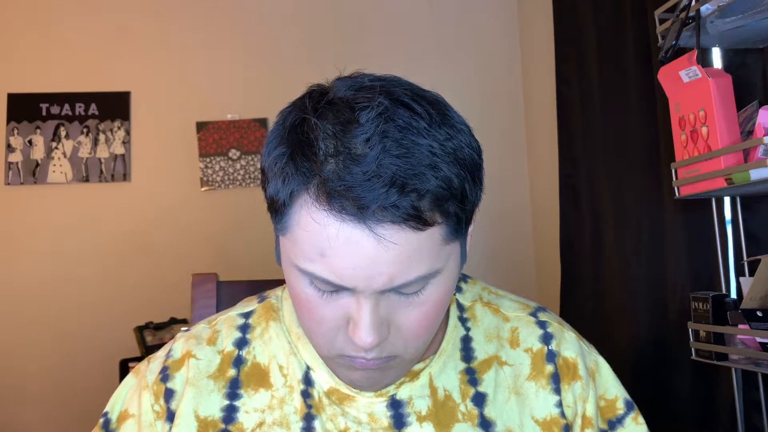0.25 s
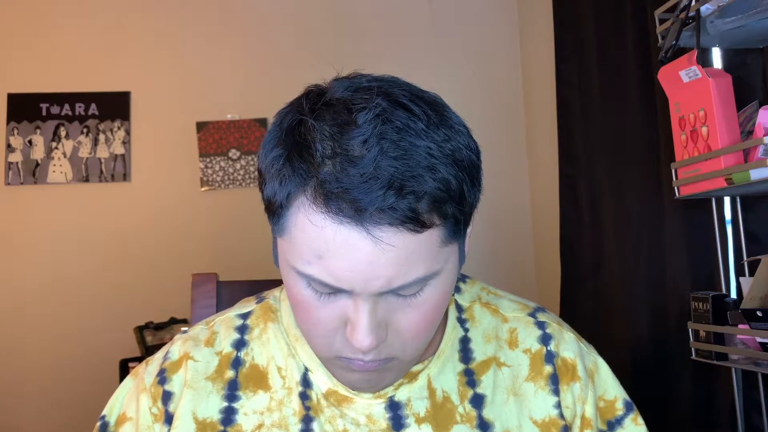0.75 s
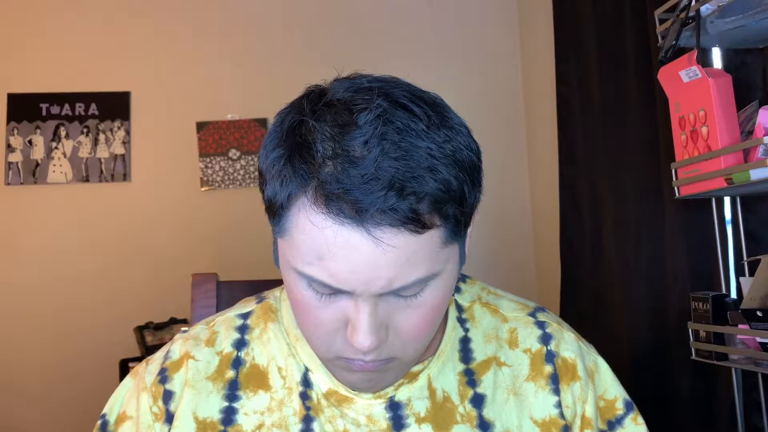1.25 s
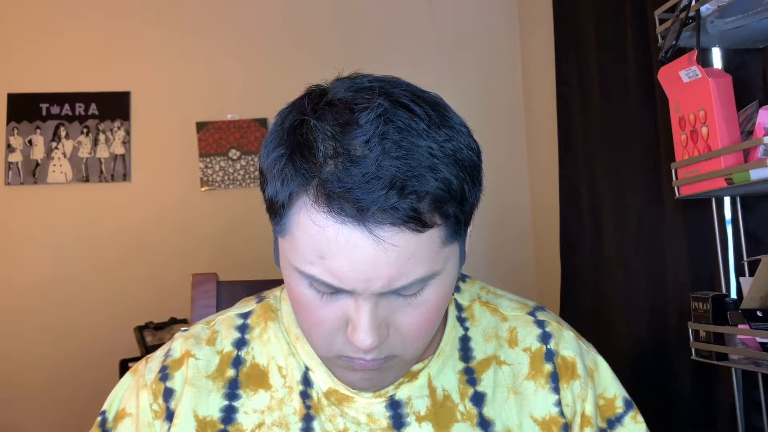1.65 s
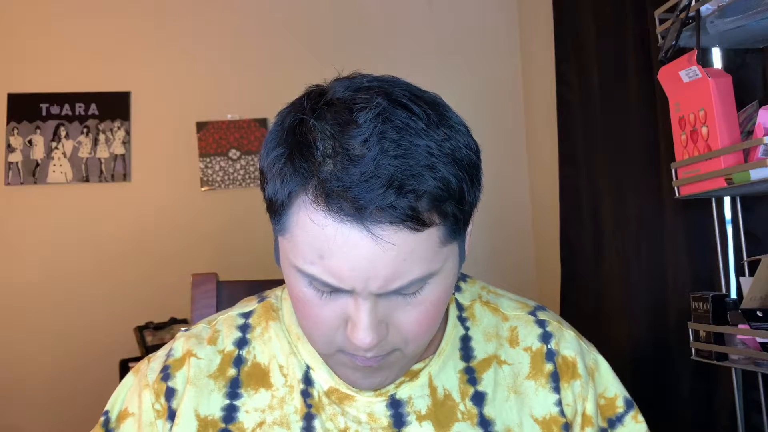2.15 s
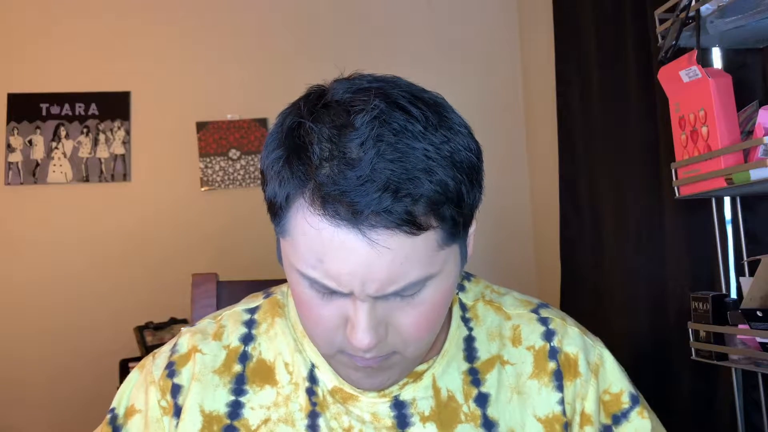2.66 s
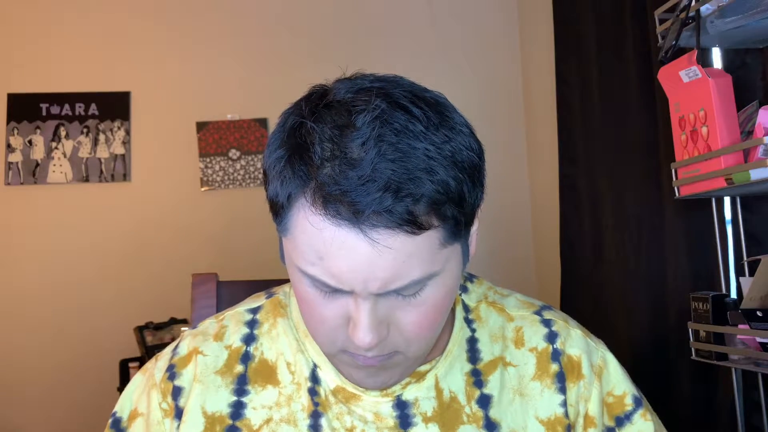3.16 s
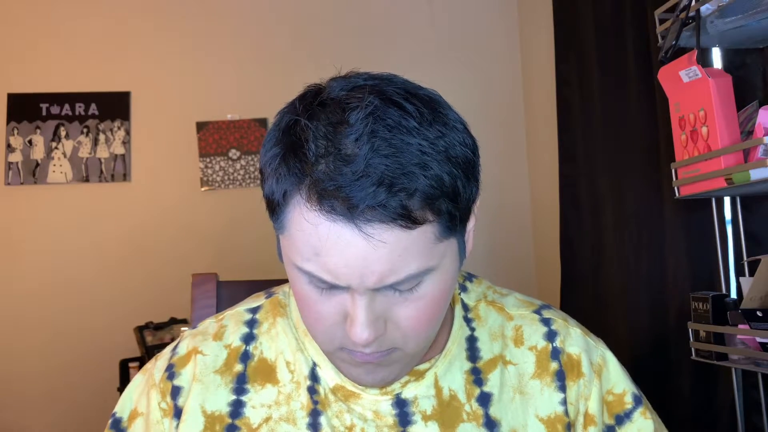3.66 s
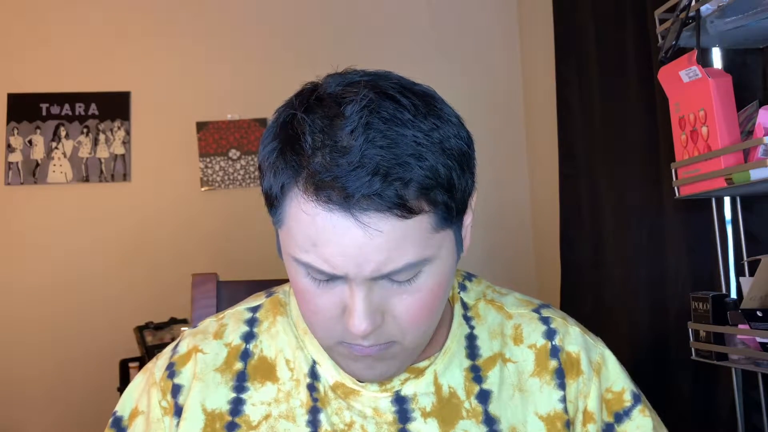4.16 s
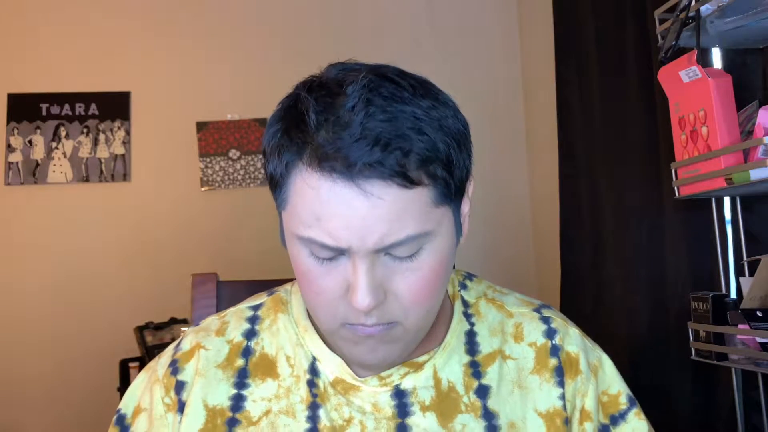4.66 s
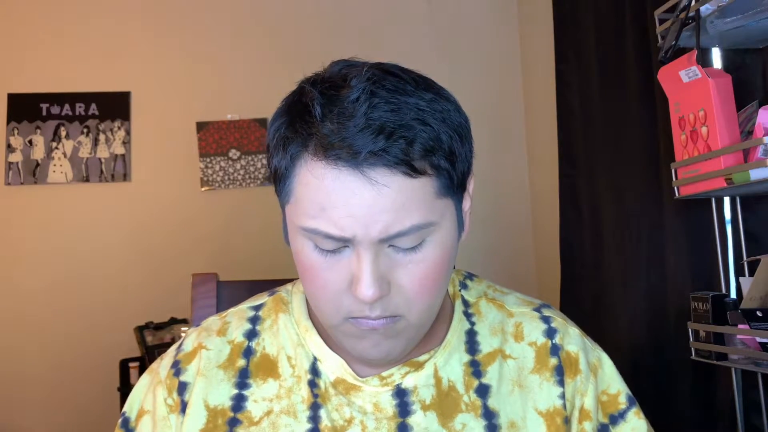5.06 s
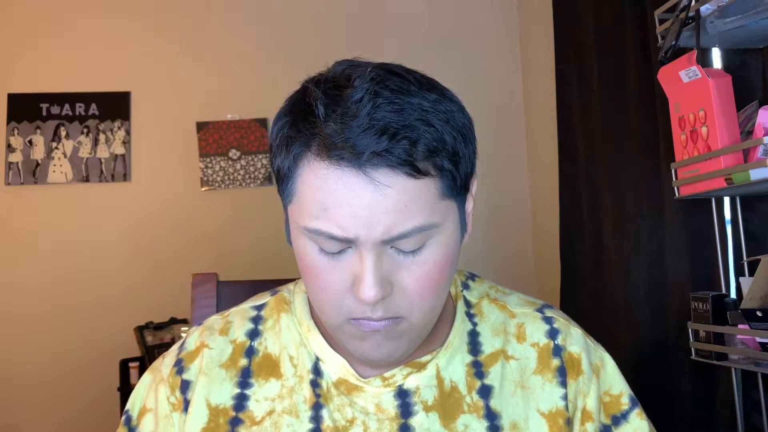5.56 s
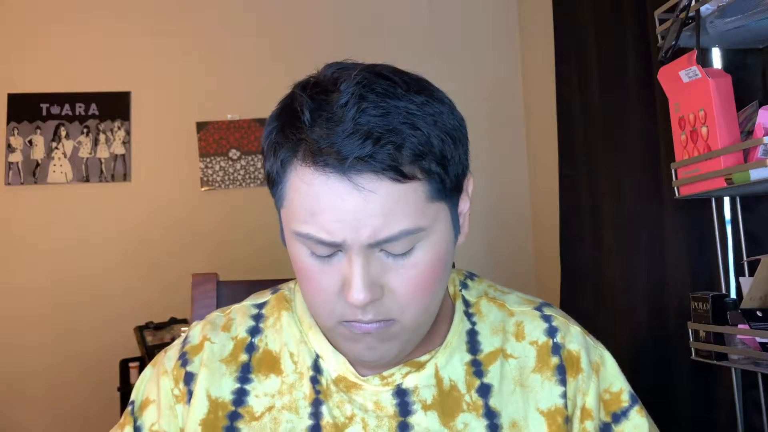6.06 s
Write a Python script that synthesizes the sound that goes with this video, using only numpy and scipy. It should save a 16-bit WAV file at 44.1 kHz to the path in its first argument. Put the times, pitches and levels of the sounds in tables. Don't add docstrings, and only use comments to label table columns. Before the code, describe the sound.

A quiet small room with steady low ventilation hum and very faint hiss, heard close to a desk. From 0 to 1.8 s there are only tiny nail ticks and almost inaudible cloth brushes. At about 1.83-2.3 s a thin stick taps a rim in three little clusters, bright and briefly ringing. At 2.54-2.61 s a plastic case gives a rapid dry rattle. Knocks in small groups follow at 2.9, 3.15, 3.3, 3.5 and 3.65 s, woody-hollow to clicky, then a second rattle at 3.85 s. A lull follows, with a grainy finger slip near 4.43 s and a double click at 4.62 s. Rubbing resumes around 4.9-5.5 s; the lid snaps at 5.15 s, then hardest, with crunch and thud, at 5.53-5.6 s. Brighter single snaps at 5.76, 5.96 and 6.06 s rebound quickly and die in a short soft tail.

```python
import sys
import numpy as np
from scipy import signal
from scipy.fft import rfft, irfft, next_fast_len
from scipy.io import wavfile
from scipy.ndimage import uniform_filter1d, map_coordinates

SR = 44100
rng = np.random.default_rng(int(sys.argv[2]) if len(sys.argv) > 2 else 0)


def linear_from_db(decibels):
    return 10 ** (np.asarray(decibels, float) / 20)


def dump(signal):
    limited = np.clip(np.atleast_2d(signal).T, -1, 1)
    pcm = np.round(limited * 32767).astype(np.int16)
    wavfile.write(sys.argv[1], SR, pcm)


N = 277731

# freq_hz, level_db_per_hz
RUMBLE_SPECTRUM = [(15, -65), (25, -34), (43, -14), (59, -4.5), (92, -8.5), (130, 1.5), (230, -10.5),
                   (263, -11.5), (289, -13), (387, -18.5), (419, -31.5), (525, -30.5), (600, -31.5),
                   (780, -64), (1320, -120)]
# freq_hz, level_db_per_hz
HISS_SPECTRUM = [(240, -31.5), (400, -9), (607, -11.5), (777, -14.5), (1030, -12.5), (1560, -16),
                 (1900, -19), (2360, -27.5), (2970, -19.5), (3530, -26), (16000, -33.5)]
# centre_hz, width_hz, lift_db
DUCT_MODES = [(76, 5.8, 11.5), (115.3, 8.7, -3.5), (258.6, 4.4, 9), (990, 55, 1.5), (1390, 20, 1.5),
              (1928, 150, 1), (3050, 88, -7)]
# freq_hz, t60_s
ROOM_T60 = [(300, 0.25), (1000, 0.24), (3000, 0.24), (7000, 0.23), (15000, 0.24)]
# freq_hz, gain_db
WALL_COLOUR = [(300, 15), (1000, 5), (3000, -0.5), (7000, 1), (15000, 2.5)]
# start_s, peak_db, ring_hz
TICKS = [(0.0281, -51, 3520), (.049, -60, 10900), (.1875, -57, 5200), (.3994, -66, 6270),
         (0.938, -63, 6660), (1.700, -58.5, 5700), (1.8803, -59, 5560), (1.9664, -54, 5740),
         (2.0914, -82, 7000), (2.1046, -55, 9300), (2.2044, -53, 9100), (2.2331, -52, 7100),
         (2.870, -79.5, 8440), (2.880, -57, 8050), (3.119, -55, 5430), (3.2933, -49, 8000),
         (3.4389, -53, 5290), (3.5955, -48, 9170), (3.7897, -53.5, 7660), (5.4827, -39, 6860),
         (5.5005, -53, 5980), (5.7322, -54, 4340), (5.746, -50, 5020), (5.833, -59, 6470),
         (5.854, -61, 7100), (5.8606, -59.5, 7280), (5.9363, -49, 7440), (5.944, -44, 5330)]
# centre_s, level_db, centre_hz, length_s
PUFFS = [
    (0.036, -77, 4800, 0.011),
    (.19, -87, 5460, 0.011),
    (.405, -83, 6000, 0.0092),
    (0.409, -82, 2060, 0.016),
    (0.836, -85, 3050, 0.018),
    (0.944, -80, 6760, 0.02),
    (1.157, -81, 6050, 0.022),
    (2.529, -71, 7450, 0.012),
]
# time_s, level_db
RUB_PRESSURE = [
    [(4.2, -89), (4.22, -76), (4.36, -78.5), (4.4, -73), (4.425, -49), (4.46, -69), (4.5, -93),
     (4.53, -58.5), (4.57, -77)],
    [(4.86, -83), (4.885, -69.5), (4.92, -100), (4.96, -74.5), (5.0, -78), (5.02, -62), (5.065, -53),
     (5.09, -64), (5.125, -61)],
    [(5.25, -74), (5.29, -60), (5.33, -60.5), (5.35, -69), (5.37, -56.5), (5.45, -57), (5.52, -73)],
    [(5.65, -66), (5.74, -68), (5.82, -89), (5.86, -72), (5.945, -74)],
]
# hollow_db, fizz_db, fizz_loss_db_per_db
RUB_GRIP = [
    (-6, -12, 0.4),
    (-6, -16, -0.7),
    (10.5, -11.5, 0),
    (5, -6.5, .1),
]
# freq_hz, gain_db
SKIN_COLOUR = [(400, -32.5), (1200, -22.5), (2000, -10.5), (2700, -5), (3600, -4.5), (4500, -17.5),
               (7000, -32.5)]
# start_s, peak_db, pitch_hz
THUDS = [(2.553, -40, 830), (2.578, -44, 495), (3.608, -52.5, 456), (3.641, -42, 720), (3.671, -47, 450),
         (3.87, -40, 745), (3.889, -40, 718), (4.689, -63, 657), (4.74, -52.5, 528), (5.142, -41.5, 494),
         (5.187, -45.5, 500), (5.535, -34.5, 634), (5.606, -43.5, 614), (6.054, -44, 534)]
# freq_hz, gain_db
STICK_COLOUR = [(300, -37.5), (1000, -18), (2000, -13.5), (2500, -5), (3100, -11.5), (4200, -16.5),
                (6600, -4.5), (9400, -10.5), (16000, -12)]
# start_s, peak_db, ring_hz, bright_db, knock_db
TAPS = [(1.8296, -40, 8270, 5, -23), (1.8506, -43, 6980, -4, -26), (1.8534, -33, 5600, -4, -27),
        (1.8606, -47, 6200, 18, -11), (1.8972, -48, 7020, -5, -38), (1.9732, -25, 7060, -12, -30),
        (1.9903, -34, 6370, -1, -29), (1.9942, -40, 8960, 0, -32), (2.1147, -22, 5380, -10, -22),
        (2.1229, -41, 5680, -7, -11), (2.134, -47, 6460, -13, -11), (2.2773, -25, 6980, 0, -21),
        (2.2827, -28, 6550, -10, -15), (2.2873, -44, 5600, -7, -11), (2.2964, -45, 7750, 2, -13),
        (2.3034, -50, 6290, -8, -12)]
# freq_hz, gain_db
CASE_COLOUR = [(250, -48), (700, -21), (1320, -11), (1900, -1.5), (2500, -5), (4000, -0.5), (7500, -3.5),
               (10100, -6.5), (14500, -5.5), (16000, -5.5)]
# start_s, peak_db, ring_hz
KNOCKS = [(2.892, -20.5, 4580), (2.906, -17.5, 2930), (2.94, -20, 1910), (2.947, -21.5, 4750),
          (2.954, -18.5, 2080), (2.962, -22, 1820), (2.971, -27, 2000), (2.979, -22.5, 1940),
          (2.997, -33, 1760), (3.131, -22, 1900), (3.158, -14, 2030), (3.3, -21.5, 1930),
          (3.315, -18.5, 1880), (3.339, -20, 1830), (3.446, -42.5, 8020), (3.451, -32.5, 4000),
          (3.473, -18, 3080), (3.482, -30, 6330), (3.49, -25.5, 3200), (3.526, -20.5, 3150),
          (3.603, -24, 4460), (3.622, -22.5, 4300), (3.641, -15.5, 3600), (3.655, -13.5, 3610),
          (3.668, -18.5, 4450), (3.828, -20, 3580)]
# start_s, peak_db, ring_hz
BEATS = [(2.539, -21, 7060), (2.548, -16.5, 8580), (2.556, -16, 3390), (2.561, -16, 7490),
         (2.566, -16, 1870), (2.574, -19, 4630), (2.583, -19, 5390), (2.588, -16.5, 5490),
         (2.594, -17.5, 5320), (2.604, -18, 7420), (2.614, -27, 8100), (3.849, -14, 3500),
         (3.857, -16, 3830), (3.861, -17, 7760), (3.87, -15.5, 4460), (3.875, -18.5, 3600),
         (3.883, -13.5, 8020), (3.893, -15, 7960), (3.895, -14.5, 8180), (3.912, -29, 8700)]
# start_s, length_s, peak_db
SHAKES = [
    (2.55, .03, -27),
    (3.845, .035, -21),
    (3.875, .032, -26.5),
]
# freq_hz, gain_db
LID_COLOUR = [(250, -51), (700, -17), (1090, -20.5), (1700, -0.5), (2500, -5.5), (4200, -2), (6140, -2),
              (9360, -5.5), (14500, -5), (16000, -1.5)]
# start_s, peak_db, ring_hz
WORKING = [(4.612, -34.5, 3000), (4.62, -16, 2870), (4.629, -14, 2070), (4.637, -33.5, 2120),
           (4.649, -44, 1960), (5.165, -18, 1800), (5.169, -20.5, 2080), (5.177, -12.5, 3490),
           (5.184, -18, 3730), (5.19, -16.5, 3850), (5.393, -19, 8140), (5.4, -34, 2100),
           (5.476, -34.5, 1880), (5.497, -43.5, 7010), (5.518, -16, 2260), (5.545, -7, 1890),
           (5.555, -9.5, 6400), (5.558, -16.5, 6030), (5.563, -17, 6100), (5.572, -6.5, 6100),
           (5.586, -14.5, 4540), (5.605, -15.5, 1430), (5.772, -19, 7300), (5.777, -23.5, 5000),
           (5.868, -30.5, 6350), (5.873, -36, 6430), (6.076, -3.5, 3540), (6.082, -18.5, 6250)]
# start_s, peak_db, ring_hz
MUFFLED = [(4.425, -38.5, 1910), (4.436, -30, 2850), (4.547, -44.5, 2270), (4.677, -29.5, 2650),
           (5.052, -44, 1920), (5.06, -36, 2660), (5.139, -15, 2070), (5.382, -28, 1870)]
# start_s, length_s, peak_db
CRUNCHES = [
    (5.158, .032, -26.5),
    (5.54, .025, -21),
    (5.56, .024, -24),
]
# start_s, peak_db, ring_hz
LID_SNAPS = [
    (5.142, -13, 2030),
    (5.533, -4, 1900),
    (5.756, -12.5, 6180),
    (5.959, -6.5, 3133),
    (6.056, -7, 3570),
]


def unit(x):
    return x / np.sqrt(np.mean(x ** 2) + 1e-20)


def unit_peak(x):
    return x / np.abs(x).max(axis=1, keepdims=True)


def along(points, hz):
    f, v = np.transpose(points)
    return np.interp(np.log(hz + 1), np.log(f + 1), v)


def filtered(x, response):
    m = next_fast_len(x.shape[-1] + 8192)
    spectrum = rfft(x, m) * response(np.fft.rfftfreq(m, 1 / SR))
    return irfft(spectrum, m)[..., :x.shape[-1]]


def resonance(centre_hz, width_hz):
    return lambda f: 1j * f * width_hz / (centre_hz ** 2 - f * f + 1j * f * width_hz)


def causal(points):
    def response(hz):
        cepstrum = irfft(np.log(linear_from_db(along(points, hz))))
        half = len(cepstrum) // 2
        cepstrum[1:half] *= 2
        cepstrum[half + 1:] = 0
        return np.exp(rfft(cepstrum))
    return response


def wobble(rate_hz):
    knots = rng.standard_normal(int(N * rate_hz / SR) + 4)
    return map_coordinates(knots, [np.arange(N) * rate_hz / SR])


def add(track, start_s, sounds):
    where = np.round(start_s * SR).astype(int)[:, None] + np.arange(sounds.shape[1])
    track += np.bincount(where.ravel(), sounds.ravel(), N + SR)[:N]
    return track


def ventilation():
    rumble_db, hiss_db = -56.5, -78.5

    def lift(hz):
        return 1 + sum(linear_from_db(db) / (1 + (2 * (hz - c) / w) ** 2) for c, w, db in DUCT_MODES)

    rumble = filtered(rng.standard_normal(N), lambda hz: lift(hz) * linear_from_db(along(RUMBLE_SPECTRUM, hz)))
    z = signal.stft(rng.standard_normal(N), nperseg=512)[2]
    field = uniform_filter1d(rng.standard_normal(z.shape), size=5, axis=0)
    field = uniform_filter1d(field, size=16, axis=1)
    patchy = signal.istft(z * linear_from_db(2.9 * unit(field)), nperseg=512)[1][:N]
    hiss = filtered(patchy, lambda hz: lift(hz) * linear_from_db(along(HISS_SPECTRUM, hz)))
    rumble_gain = linear_from_db(rumble_db + 0.95 * wobble(3))
    hiss_gain = linear_from_db(hiss_db + 0.27 * wobble(2.6))
    return rumble_gain * unit(rumble) + hiss_gain * unit(hiss)


def room(x, count=24):
    hz, t, z = signal.stft(rng.standard_normal((count, SR // 2)), SR, nperseg=256)
    decay_db = along(WALL_COLOUR, hz)[:, None] - 60 * t / along(ROOM_T60, hz)[:, None]
    tails = signal.istft(z * linear_from_db(decay_db), SR, nperseg=256)[1]
    onset_s = 0.0013
    tails = tails * (1 - np.exp(-np.arange(tails.shape[1]) / (onset_s * SR)))
    tails = tails / np.linalg.norm(tails[0])
    stretch = np.arange(N) * count // N == np.arange(count)[:, None]
    return signal.fftconvolve(x * stretch, tails, axes=1)[:, :N].sum(axis=0)


def puffs():
    t, out = np.arange(N) / SR, np.zeros(N)
    for s, db, hz, length_s in PUFFS:
        noise = filtered(rng.standard_normal(SR // 5), lambda f: 1 / (1 + ((f - hz) / (0.14 * hz)) ** 4))
        near = slice(max(round((s - .1) * SR), 0), round((s + .09) * SR))
        swell = np.exp(-((t[near] - s) / length_s) ** 2)
        out[near] += linear_from_db(db) * swell * unit(noise)[:len(swell)]
    return out


def rubbing():
    light_db = -69
    t, out = np.arange(N) / SR, np.zeros(N)
    grains = rng.standard_normal((3, N)) * linear_from_db(2.3 * wobble(500) + 1.9 * wobble(99))
    body = unit(filtered(grains[0], lambda hz: linear_from_db(along(SKIN_COLOUR, hz))))
    hollow = unit(filtered(grains[1], lambda hz: 1 / (1 + ((hz - 1850) / 230) ** 2)))
    fizz = unit(filtered(grains[2], lambda hz: 1 / (1 + (4500 / (hz + 1)) ** 6) / (1 + (hz / 9000) ** 2)))
    for rows, (hollow_db, fizz_db, loss) in zip(RUB_PRESSURE, RUB_GRIP):
        s, level_db = np.transpose(rows)
        bright_db = np.minimum(fizz_db - loss * (level_db - light_db), 0)
        fade = np.interp(t, [s[0] - .02, s[0], s[-1], s[-1] + .02], [0, 1, 1, 0])
        dull = (body + linear_from_db(hollow_db) * hollow) / np.sqrt(1 + linear_from_db(2 * hollow_db))
        grain = dull + linear_from_db(np.interp(t, s, bright_db)) * fizz
        out += fade * linear_from_db(np.interp(t, s, level_db)) * grain
    return out


def thuds():
    t = np.arange(2048) / SR
    s, db, hz = np.transpose(THUDS)[:, :, None]
    push = (1 - np.exp(-t / 0.0005)) * linear_from_db(-60 * t / 0.041) * np.sin(2 * np.pi * hz * t)
    return add(np.zeros(N), s[:, 0], linear_from_db(db + 4.0) * push)


def clicks(rows, colour, crack, hold_s, ring_db, knock_hz):
    t = np.arange(1024) / SR
    s, db, ring_hz, bright_db, knock_db = np.transpose(rows)[:, :, None]
    noise = rng.standard_normal((len(s), 2, len(t)))
    rise = 1 - np.exp(-t / .0001)

    first = crack * linear_from_db(-60 * t / 0.0028)
    touching = np.exp(-(t / hold_s - .4) ** 2)
    settling = linear_from_db(-7.5 - 60 * t / 0.072)
    burst = filtered(noise[:, 0] * rise * (first + touching + settling), causal(colour))
    burst = filtered(burst, lambda hz: .6 + 1.1 / (1 + ((hz - ring_hz) / (.2 * ring_hz)) ** 2))
    treble = filtered(burst, lambda hz: 1 / (1 + (7500 / (hz + 1)) ** 6))
    snap = burst - treble + linear_from_db(bright_db + 5.0) * treble

    ring = rise * linear_from_db(-60 * t * ring_hz / 13) * np.sin(2 * np.pi * ring_hz * t)
    sharp = snap + linear_from_db(ring_db) * ring

    knock = filtered(noise[:, 1] * linear_from_db(-60 * t / 0.021), resonance(knock_hz, 0.94 * knock_hz))
    knock = filtered(knock, resonance(knock_hz, 3.4 * knock_hz))
    contact = unit_peak(sharp) + linear_from_db(knock_db + 0.5) * unit_peak(knock)
    return add(np.zeros(N), s[:, 0], linear_from_db(db - 0.5) * contact)


def coloured(rows, bright_db, knock_db):
    middling_db, dulling_db_per_db, outsnap_db_per_db, scatter_db = -24, 0.14, .4, 3
    s, db, hz = np.transpose(rows)
    scatter = scatter_db * rng.standard_normal((len(s), 2)).T
    hard_db = db - middling_db
    bright = bright_db - dulling_db_per_db * hard_db + scatter[0]
    knock = knock_db - outsnap_db_per_db * hard_db + scatter[1]
    return np.transpose([s, db, hz, bright, knock])


def chatter(spans, count=5):
    low_hz, high_hz, scatter_db = 3000, 8500, 4
    start, length, db = np.repeat(spans, count, axis=0).T
    place, pitch, size = rng.random((len(db), 3)).T
    s = start + length * (np.arange(len(db)) % count + place) / count
    return np.transpose([s, db + scatter_db * (2 * size - 1), low_hz * (high_hz / low_hz) ** pitch])


def rebounds(count=3):
    gap_s, loss_db = .0032, 5.5
    return [(s + k * gap_s, db - k * loss_db, hz) for s, db, hz in LID_SNAPS for k in range(count)]


def far_ticks():
    rows = [(*row, 0, -40) for row in TICKS]
    return clicks(rows, STICK_COLOUR, crack=1.5, hold_s=0.00056, ring_db=5, knock_hz=866)


def stick_taps():
    return clicks(TAPS, STICK_COLOUR, crack=3.3, hold_s=0.0019, ring_db=2.0, knock_hz=974)


def case_rattle():
    rows = [coloured(KNOCKS, bright_db=0, knock_db=-19.5),
            coloured(BEATS, bright_db=-5, knock_db=-19),
            coloured(chatter(SHAKES), bright_db=-2, knock_db=-18)]
    return clicks(np.vstack(rows), CASE_COLOUR, crack=.8, hold_s=0.0019, ring_db=-1.0, knock_hz=890)


def lid_snaps():
    rows = [coloured(rebounds(), bright_db=-2.5, knock_db=-24),
            coloured(WORKING, bright_db=-2.5, knock_db=-26),
            coloured(MUFFLED, bright_db=-41.5, knock_db=-15),
            coloured(chatter(CRUNCHES, count=3), bright_db=0.0, knock_db=-22.5)]
    return clicks(np.vstack(rows), LID_COLOUR, crack=4.9, hold_s=0.0015, ring_db=-0.5, knock_hz=1130)


def scene():
    ticks, thud, taps, rattle, lid = far_ticks(), thuds(), stick_taps(), case_rattle(), lid_snaps()
    send = linear_from_db(-5.0) * ticks + linear_from_db(-14.0) * thud + linear_from_db(-10) * taps
    send = send + linear_from_db(-10.5) * rattle + linear_from_db(-11.0) * lid
    hands = puffs() + rubbing()
    return (ventilation() + room(send) + hands + ticks + thud + taps + rattle + lid)[None]


def roll_off(x):
    return signal.sosfilt(signal.butter(12, 17110, fs=SR, output="sos"), x)


def record(dry):
    band = [(15, -30), (30, 0), (15700, 0), (16100, -20), (16900, -24), (17300, -70)]  # freq_hz, gain_db
    mix = filtered(dry, causal(band))
    return roll_off(mix)


dry = scene()
out = record(dry)
dump(out)
```